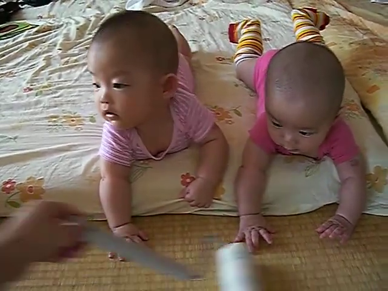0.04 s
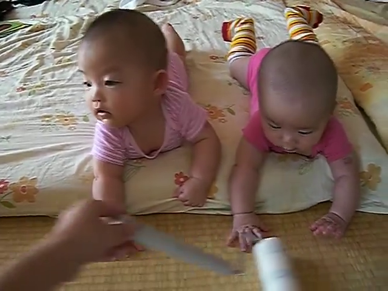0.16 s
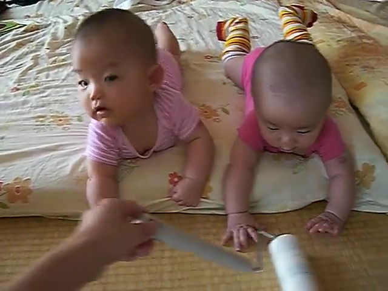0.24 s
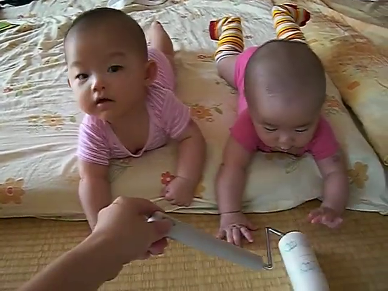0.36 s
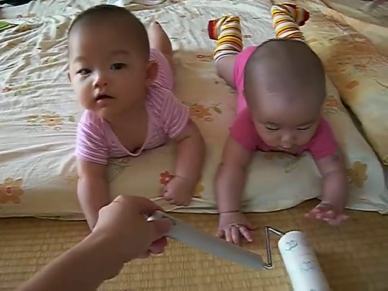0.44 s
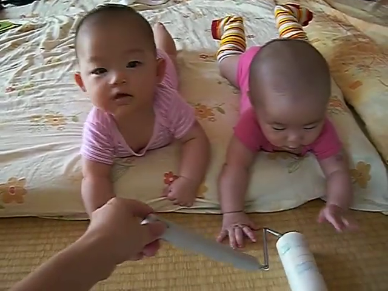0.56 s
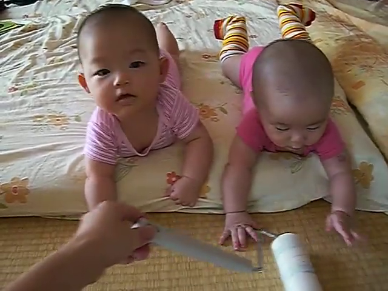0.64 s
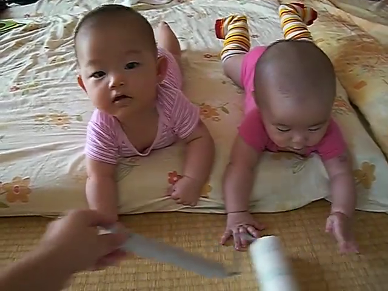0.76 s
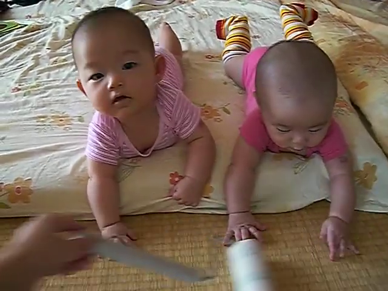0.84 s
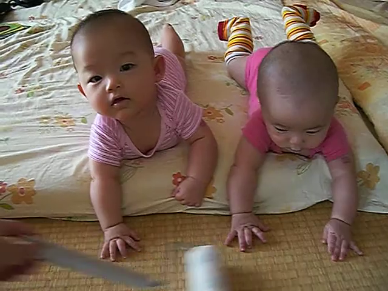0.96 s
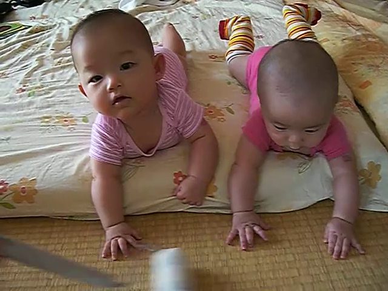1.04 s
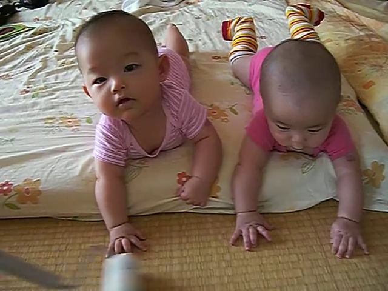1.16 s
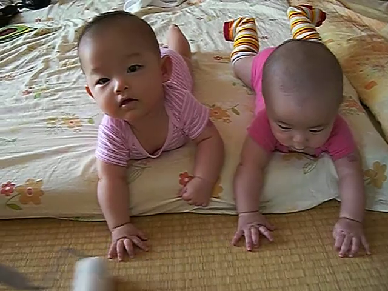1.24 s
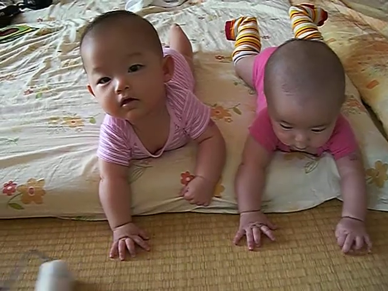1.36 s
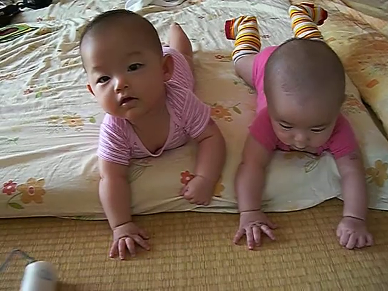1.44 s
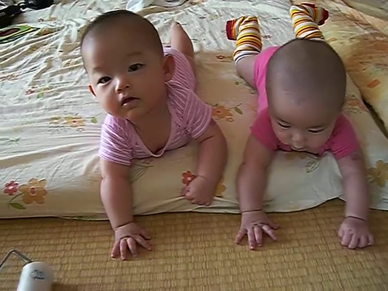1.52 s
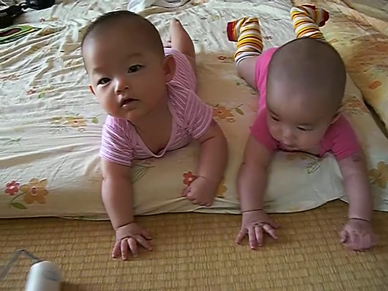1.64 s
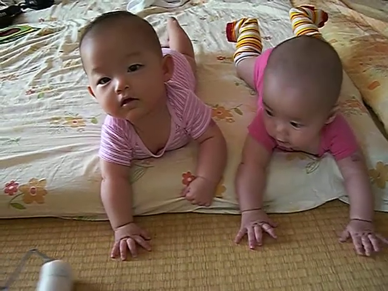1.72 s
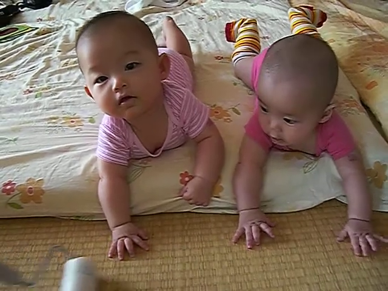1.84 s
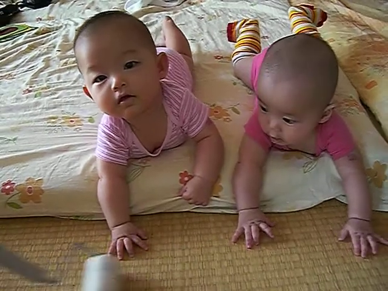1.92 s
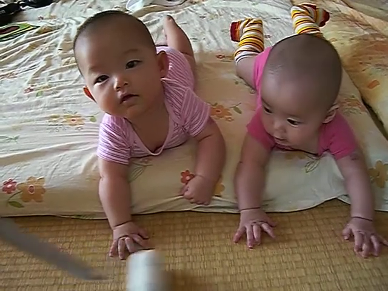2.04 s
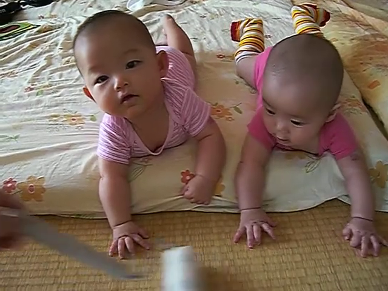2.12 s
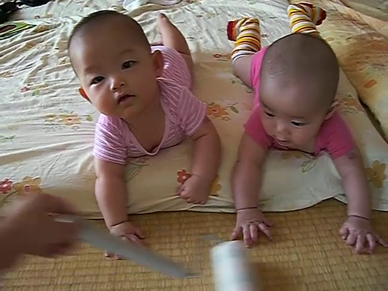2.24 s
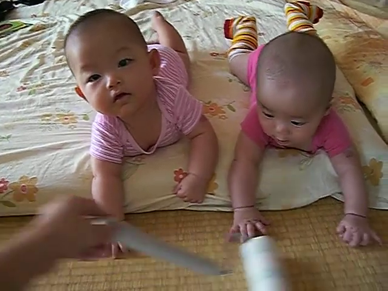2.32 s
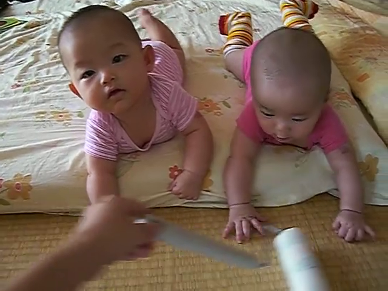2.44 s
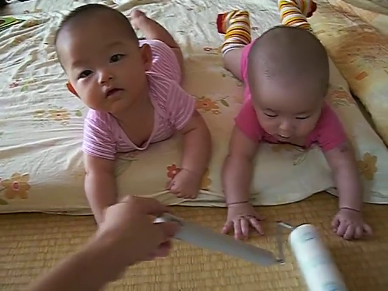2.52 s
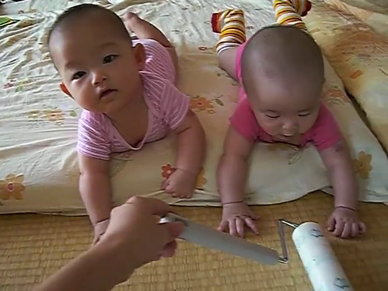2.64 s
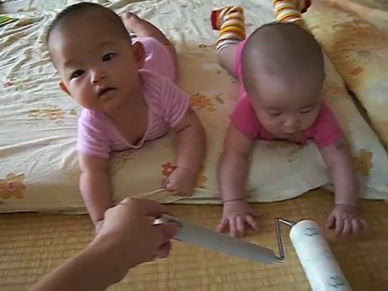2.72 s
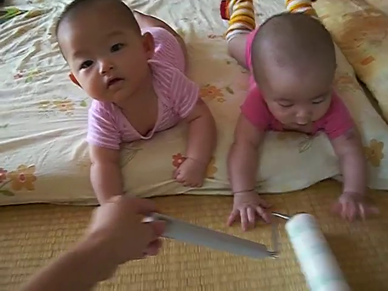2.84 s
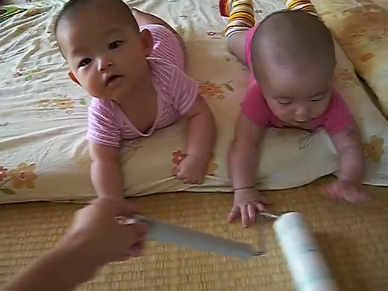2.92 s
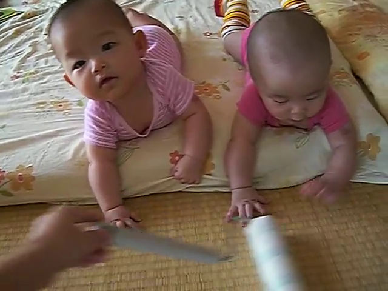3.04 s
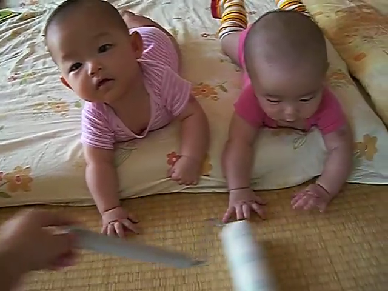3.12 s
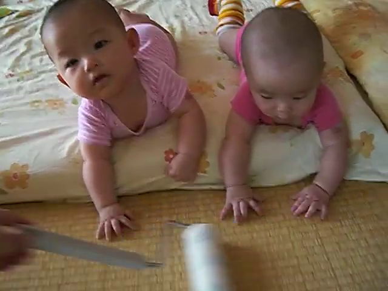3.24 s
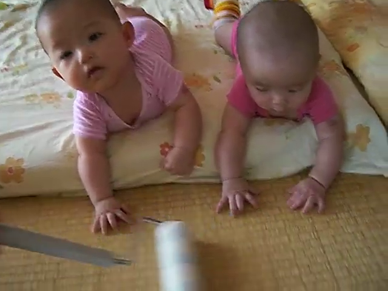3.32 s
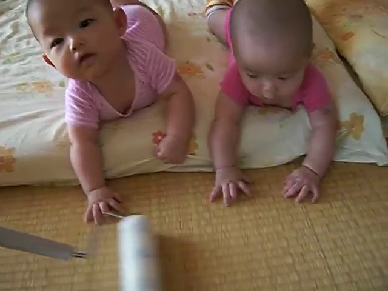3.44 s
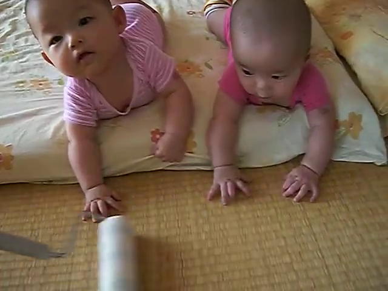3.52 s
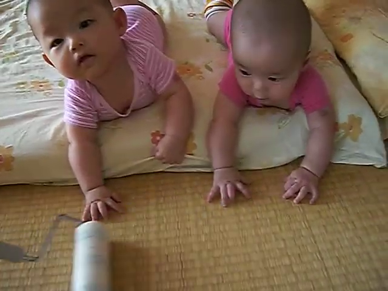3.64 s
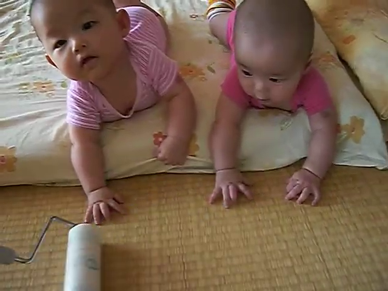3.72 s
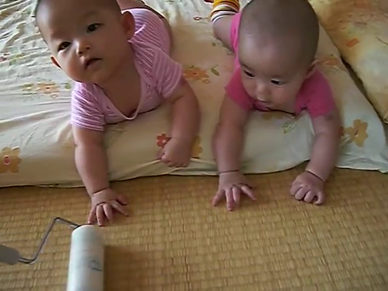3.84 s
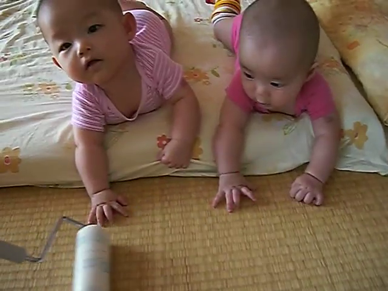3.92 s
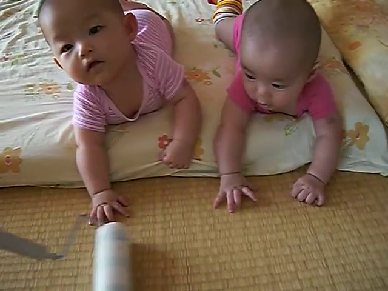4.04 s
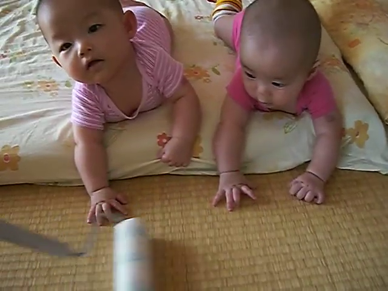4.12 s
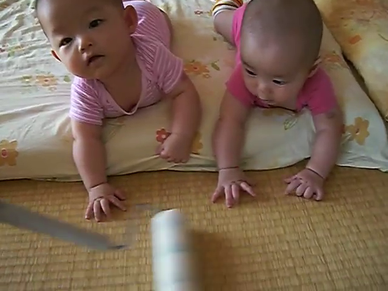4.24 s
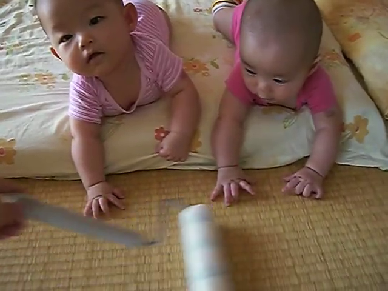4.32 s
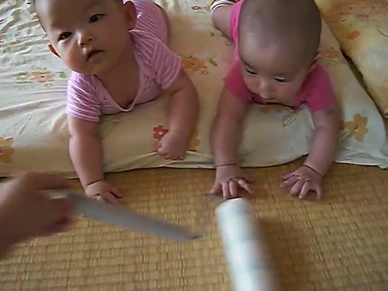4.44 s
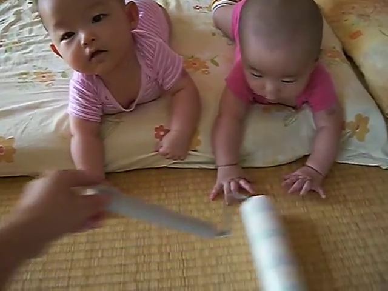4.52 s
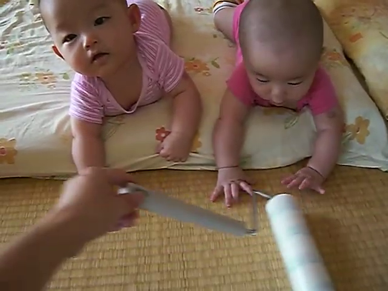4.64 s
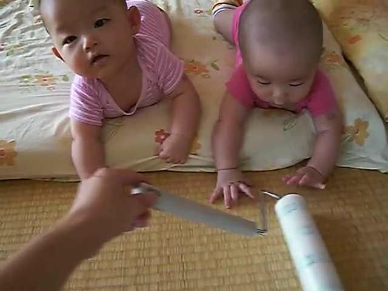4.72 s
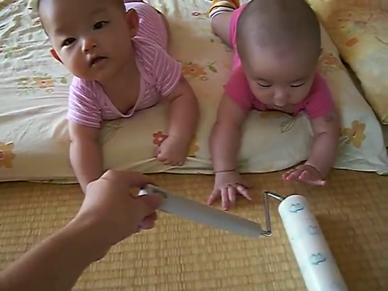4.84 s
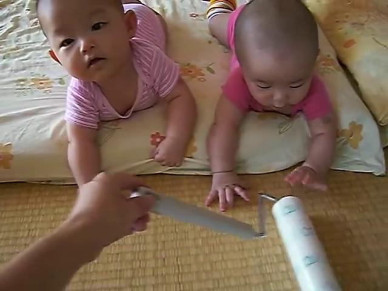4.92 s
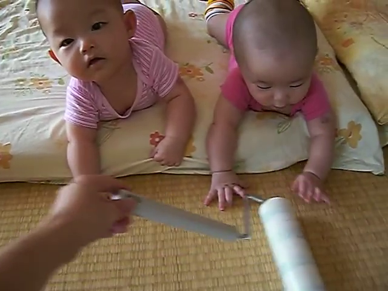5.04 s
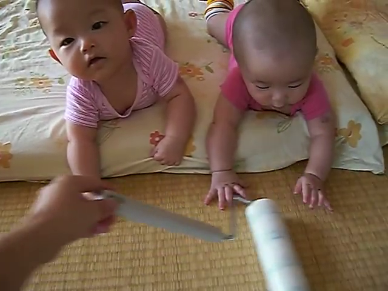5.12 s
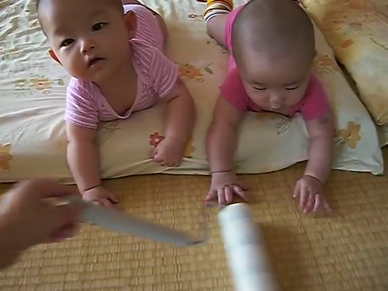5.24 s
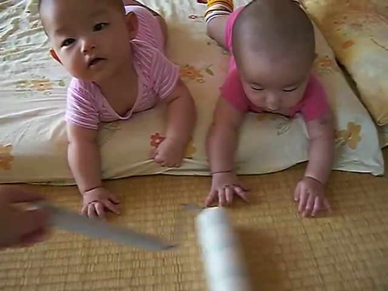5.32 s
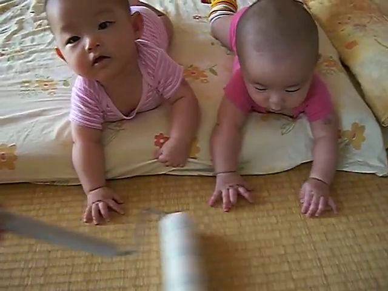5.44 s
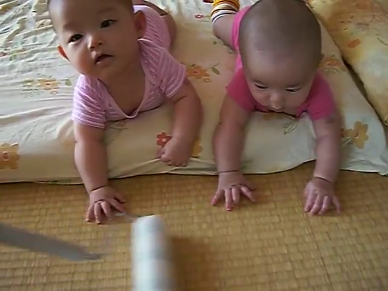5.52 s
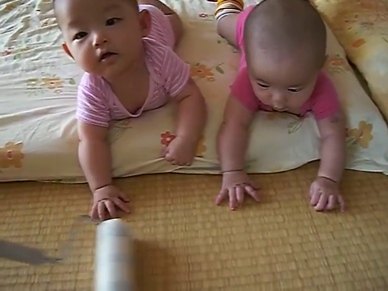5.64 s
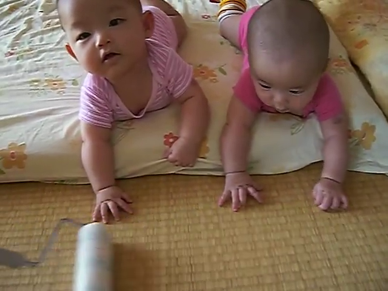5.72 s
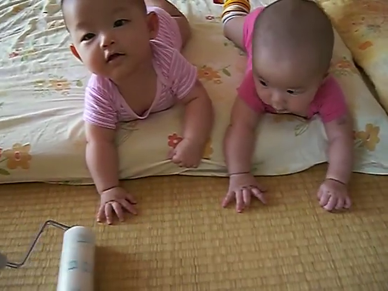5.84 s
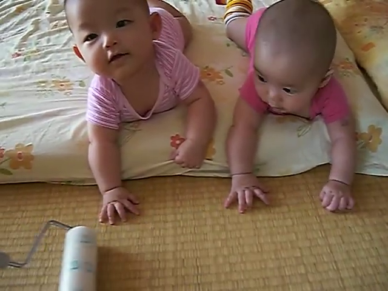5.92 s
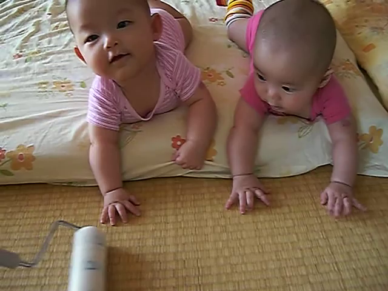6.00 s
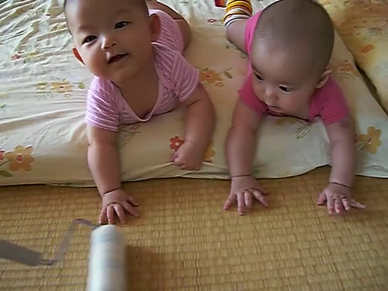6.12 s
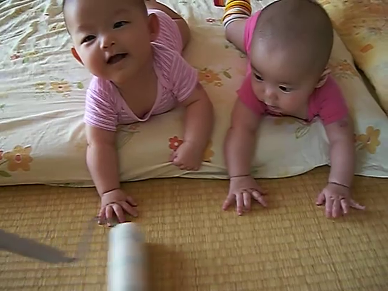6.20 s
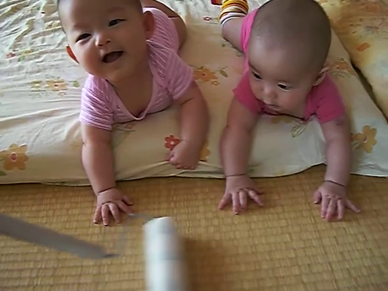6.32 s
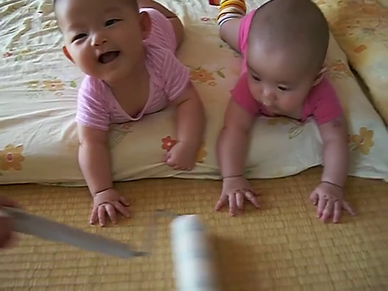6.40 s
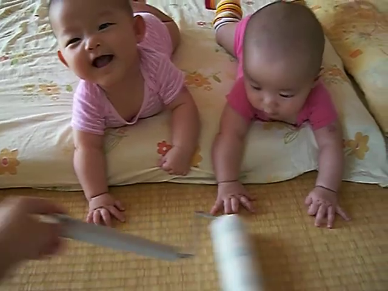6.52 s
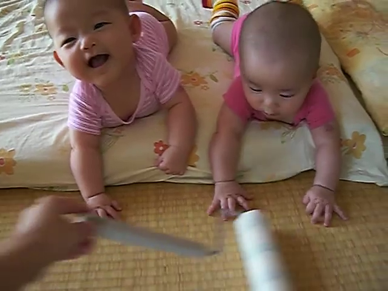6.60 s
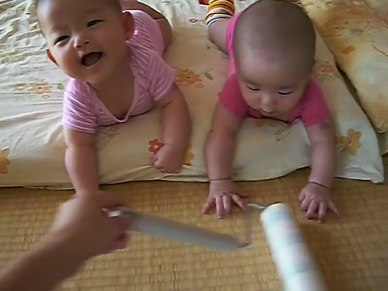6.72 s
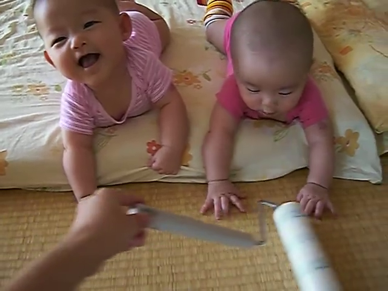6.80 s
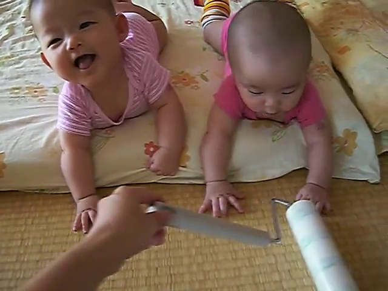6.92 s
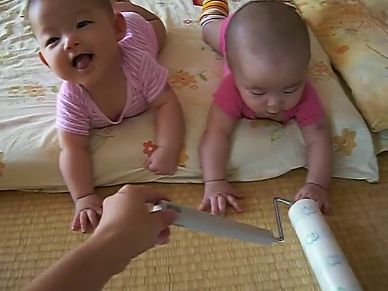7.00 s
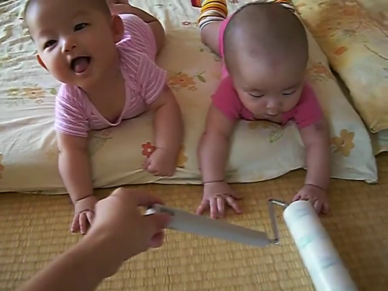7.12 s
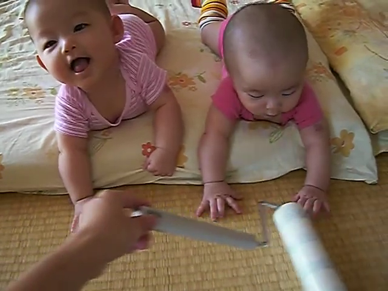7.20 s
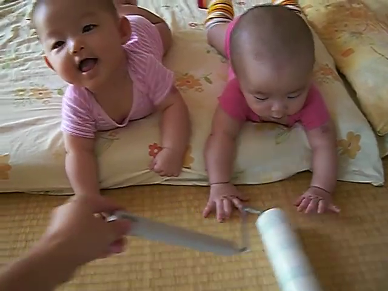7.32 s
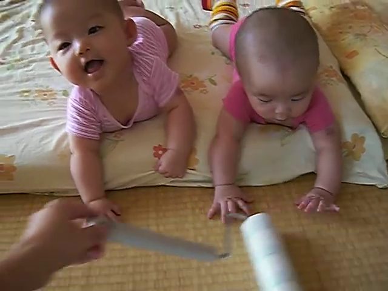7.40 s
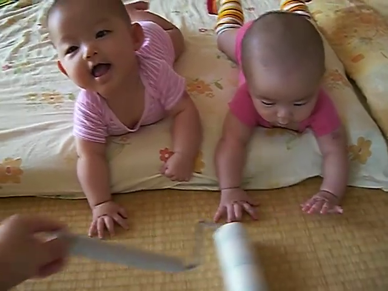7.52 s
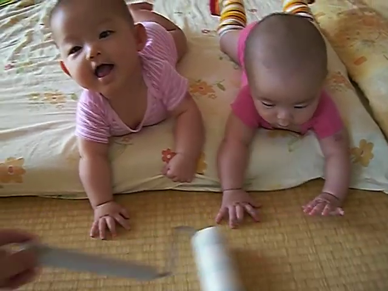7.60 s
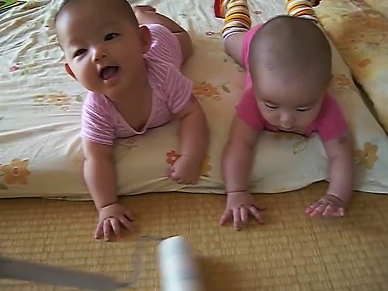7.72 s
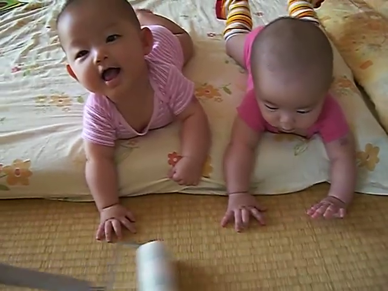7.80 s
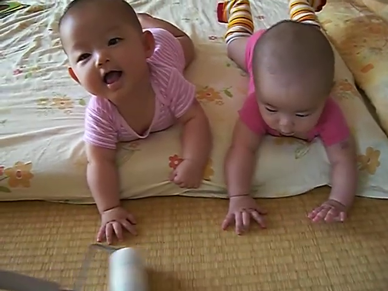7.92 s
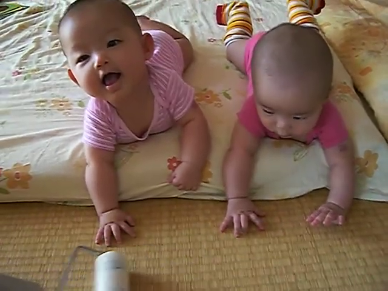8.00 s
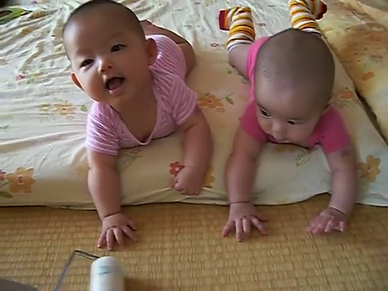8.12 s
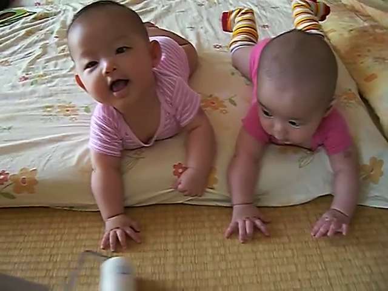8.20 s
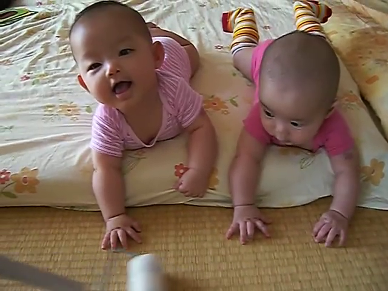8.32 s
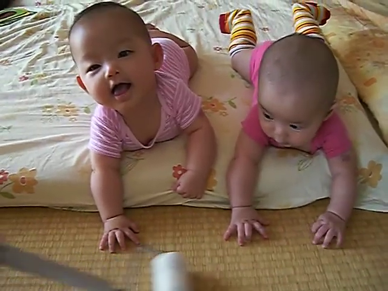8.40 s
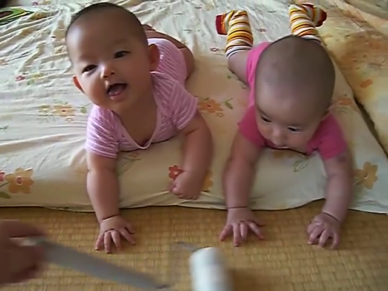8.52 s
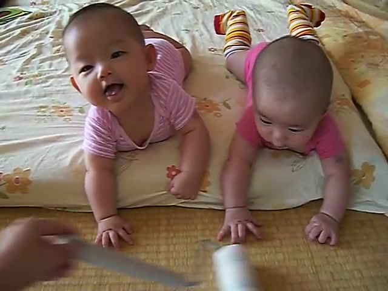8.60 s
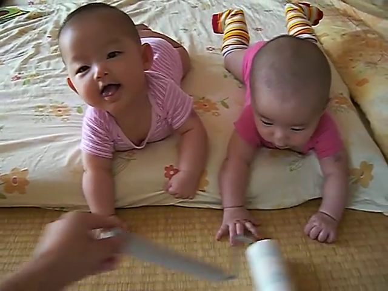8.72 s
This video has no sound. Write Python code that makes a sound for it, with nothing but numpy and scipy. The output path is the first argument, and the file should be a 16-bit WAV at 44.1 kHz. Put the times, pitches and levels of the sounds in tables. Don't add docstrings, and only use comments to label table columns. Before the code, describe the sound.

Dry, crisp, tearing crackle of an adhesive lint roller swishing to and fro across a rush mat, close up, with brief lulls at each turn.

```python
import sys
import numpy as np
from scipy import signal
from scipy.fft import rfft, irfft, next_fast_len
from scipy.io import wavfile
from scipy.ndimage import map_coordinates

SR = 44100
rng = np.random.default_rng(int(sys.argv[2]) if len(sys.argv) > 2 else 0)


def invert_db(x):
    u = np.asarray(x, float) / 20
    return 10 ** u


def file_out(sig):
    cols = np.atleast_2d(sig).T
    lim = np.clip(cols, -1, 1)
    pcm = np.round(lim * 32767).astype(np.int16)
    wavfile.write(sys.argv[1], SR, pcm)


N = 386309

TURNS = [-.56, .51, 1.6, 2.71, 3.86, 4.92, 5.97, 7.1, 8.16, 9.21]
# start t/s, stop t/s, crackle level/dB at top speed,
# share of the stroke before top speed [0-1], steepness of start and stop [exponent]
STROKES = [
    (-.52, 0.423, -23.5, 0.59, 0.95),
    (.55, 1.553, -23, .6, 0.91),
    (1.595, 2.622, -23.5, 0.62, 0.96),
    (2.78, 3.809, -26.5, 0.51, 0.85),
    (3.867, 4.864, -25.5, .55, 1.21),
    (4.965, 5.919, -24, 0.59, .8),
    (5.96, 7.013, -23.5, 0.54, 1.29),
    (7.18, 8.11, -25, 0.53, 0.78),
    (8.192, 9.155, -24.5, 0.42, 1.84),
]
TOP_RATE = [135, 140, 140, 95, 125, 115, 125, 115, 130]
# t/s, loss level/dB, half the passing time t/s
WORN_PATCHES = [(.11, 4, .02), (.28, 9.5, 0.0084), (.79, 8, 0.011), (.97, 2.5, 0.013), (1.2, 8.5, 0.011),
                (1.33, 4, 0.02), (2.08, 4.5, 0.02), (2.31, 1, 0.02), (3.04, 3.5, 0.016), (3.24, 6, 0.028),
                (3.64, 7, 0.011), (4.11, 14, 0.0072), (4.8, 2.5, .02), (5.05, 0.5, .03), (5.21, 8, 0.01),
                (5.411, 5.5, 0.019), (5.709, 11, 0.015), (6.25, 4.5, 0.043), (6.55, 6, 0.011),
                (6.94, 8, 0.028), (1.95, 4, .02), (.64, 6, .012), (7.28, 3, 0.022), (7.651, 7.5, 0.04),
                (7.92, -0.5, 0.022), (8.06, 17, 0.026), (8.61, 3.5, 0.021)]
# t/s, peak level/dB
CLEAR_TEARS = [(0.5585, -27.5), (0.5967, -20.5), (0.624, -20), (0.6503, -17.5), (0.716, -10.5),
               (1.6337, -30), (1.662, -31), (1.7204, -17), (2.7556, -27), (2.797, -19.5), (2.814, -26),
               (2.8383, -28), (2.8626, -12), (3.9005, -32), (3.951, -22), (4.9705, -25), (5.001, -13.5),
               (5.0095, -16), (5.067, -18), (6.0088, -26), (6.0506, -26), (6.0904, -15.5), (7.1576, -34),
               (7.1912, -22), (7.2178, -22), (7.2635, -17), (7.3376, -10.5), (8.2099, -26), (8.2372, -20),
               (8.2767, -27),
               (0.3597, -17), (0.391, -22), (0.416, -16.5), (1.4764, -21), (1.527, -18), (2.519, -13),
              (2.5447, -16), (2.5796, -17.5), (2.606, -13), (3.699, -10.5), (3.756, -16), (3.7743, -24),
              (3.8386, -21), (4.7355, -11), (4.7756, -16), (4.815, -17.5), (4.831, -27), (4.8513, -27),
              (5.8663, -12.5), (5.8832, -15.5), (5.9035, -17), (6.9042, -19), (6.9386, -21), (6.981, -24),
              (7.0275, -34), (7.0664, -37), (8.0096, -19), (8.07, -26), (8.1, -34), (8.1213, -27.5),
               (0.196, -9), (0.9013, -8.5), (1.2963, -8), (1.9624, -28), (2.15, -11), (3.015, -16),
              (3.1916, -6.5), (3.3596, -8), (3.5384, -6.5), (4.0637, -15), (4.1984, -10), (4.4847, -7.5),
              (4.6637, -11), (5.1277, -12), (5.1836, -8.5), (5.3564, -4.5), (5.672, -9), (6.2083, -9.5),
              (6.3225, -10), (6.379, -19), (6.5954, -5), (6.645, -6), (6.7725, -5.5), (6.8498, -9),
              (7.4405, -6), (7.889, -9), (7.933, -7.5), (8.4484, -23), (8.5318, -8), (8.6293, -18),
               (0.382, -18), (0.619, -26), (0.661, -16.5), (1.5028, -24), (1.649, -30), (1.6816, -23),
         (1.698, -21), (2.5866, -24), (2.7674, -30), (2.7843, -27), (2.8224, -22), (3.8192, -32),
         (3.9213, -31), (3.937, -28), (3.9736, -19), (4.9501, -42), (4.989, -23), (5.0205, -17),
         (5.033, -21), (6.0234, -22.5), (6.0337, -24), (6.0645, -24), (6.9627, -24), (7.0005, -32),
         (7.091, -42), (7.2294, -24), (7.2488, -21), (8.0364, -24), (8.0776, -26), (8.2609, -19)]
# f/Hz, level/dB per Hz
GLUE = [(40, -30), (175, -18), (620, -12.5), (900, -1), (1150, 1), (1700, -6), (2300, 0), (3900, 1),
        (6000, 0), (7600, -4), (10500, -7), (13500, -6.5), (15000, -7)]
# from f/Hz, to f/Hz
PARTS = [
    (1650, 4750),
    (4750, 7900),
    (7900, 30000),
    (10, 1650),
    (3300, 4500),
]
FACING = {"right": [(0, 0, -1.5, -1), (.3, -2, -5, -6.5), (.6, -1.5, -4, -7), (1, -4, 0, -2.5)],
          "left": [(0, -1, 0, -1), (.3, 0.5, -3, -7.5), (.65, -3, -4.5, -8), (1, -3, -6, -4)]}
ECHO_MS = [2, 1.15, 2.15, 1.13, 1.9, 1.16, 2, 1.05, 1.87, 1.1]
ECHO_SHARE = [.55, .65, .2, .3, .55]
# f/Hz, time to fall 60 dB t/s
ROOM = [(200, 0.21), (2000, 0.17), (10000, 0.11)]
# f/Hz, level/dB per Hz
BOARDS = [(30, -23), (70, -22), (170, 11), (600, 8), (900, -21), (1500, -29)]
# f/Hz, level/dB per Hz
AIR = [(20, 7.5), (60, 9.5), (120, 7.5), (500, 7.5), (1100, 5), (1500, -6), (2200, -47)]
# f/Hz, rms level/dB
TONES = [
    (119.8, -66),
    (15734, -71),
]
# f/Hz, width f/Hz
NOTCHES = [(4720, 560), (7880, 350), (9420, 360), (14130, 160)]
# f/Hz, level/dB per Hz
HISS = [(1000, -27), (1700, -1), (4700, -9.5), (6260, -6), (7750, -15), (14700, -7.5), (15500, -3)]

CREEP_RATE, FAST_RATE = 55, 135
RESTING_DB = -84
WORN_GAPS = 3.6
SNAP_DB, SNAP_SLOW_DB, SNAP_SCATTER_DB = 4, 23, 2.5
ECHO_RIGHT, ECHO_LEFT, ECHO_GROWS = .08, .4, .16
HISS_DB, TOP_HZ = -58, 15790


def unit(x):
    return x / np.sqrt(np.mean(x ** 2) + 1e-20)


def along(points, hz):
    f, v = np.transpose(points)
    return np.interp(np.log(hz + 1), np.log(f + 1), v)


def curves(rows, at):
    s, *cols = np.transpose(rows)
    return [np.interp(at, s, c) for c in cols]


def filtered(x, response):
    m = next_fast_len(N + SR // 4)
    return irfft(rfft(x, m) * response(np.fft.rfftfreq(m, 1 / SR)), m)[..., :N]


def coloured(points):
    return unit(filtered(rng.standard_normal(N), lambda hz: invert_db(along(points, hz))))


def stroke_at(t):
    stroke = np.interp(t, TURNS, np.arange(len(TURNS)))
    number = stroke.astype(int)
    return number, stroke % 1, number % 2 == 0


def strands():
    turn, done, _ = stroke_at(np.arange(N) / SR)
    per_s = CREEP_RATE + (np.take(TOP_RATE, turn) - CREEP_RATE) * np.sin(np.pi * done)
    uneven = map_coordinates(rng.standard_normal(800), [np.arange(N) * 60 / SR])
    return np.cumsum(per_s) / SR + .25 * uneven, per_s


def worn_db(t):
    return sum(db * np.exp(-((t - s) / half_s) ** 2) for s, db, half_s in WORN_PATCHES)


def peel_db(t):
    power = invert_db(2 * RESTING_DB)
    for start, stop, db, lean, steep in STROKES:
        done = np.clip((t - start) / (stop - start), 0, 1)
        done = done ** (np.log(.5) / np.log(lean))
        power = power + invert_db(2 * db) * np.abs(np.sin(np.pi * done)) ** (2 * steep)
    return 10 * np.log10(power) - worn_db(t)


def crackle(passed, per_s, count=60000):
    u = rng.random((count, 2))
    t = u[:, 0] * (N - 1) / SR
    at = (t * SR).astype(int)
    passed, per_s = passed[at], per_s[at]
    grip_db = 1.6 * rng.standard_normal(2000)[passed.astype(int) + 9]
    speed = per_s / FAST_RATE
    trail = 0.12 * speed ** 3 * invert_db(-2 * WORN_GAPS * worn_db(t))
    since_s = (passed % 1) / per_s
    rise_s, burst_s = 0.00046, 0.0028
    burst = np.exp(-since_s / burst_s) * (1 - np.exp(-since_s / rise_s))
    bunch = (trail + burst) / (trail + 1.3 * burst_s * per_s)
    size = np.sqrt(bunch) * invert_db(grip_db - 3.5 * np.log(u[:, 1] + .003))
    size /= np.sqrt(np.sum(size ** 2) / N)
    return t, size * invert_db(peel_db(t) - 1.13 - 1.9 * (1 - speed) ** 2)


def snaps(passed, per_s, count=16):
    clear = np.transpose(CLEAR_TEARS)
    gone = np.flatnonzero(np.diff(np.floor(np.maximum.accumulate(passed))))
    spread = np.clip(rng.standard_normal(len(gone)), -3, 1.6)
    slow_db = SNAP_SLOW_DB * (1 - per_s[gone] / FAST_RATE)
    own_db = peel_db(gone / SR) + SNAP_DB + slow_db + SNAP_SCATTER_DB * spread
    apart_s = np.abs(gone[:, None] / SR - clear[0]).min(axis=1)
    own_db -= 30 * (apart_s < .007)
    s, db = np.hstack([clear, [gone / SR, own_db]])
    lag = rng.random((len(s), count)) * np.arange(count) * .0003
    share = invert_db(-2200 * lag + 2 * rng.standard_normal(lag.shape))
    share /= np.linalg.norm(share, axis=1, keepdims=True)
    return (s[:, None] + lag).ravel(), (invert_db(db + 9.5)[:, None] * share).ravel()


def ring(lo_hz, hi_hz):
    hz = np.fft.rfftfreq(4096, 1 / SR) + 1
    gain = invert_db(along(GLUE, hz)) / np.sqrt((1 + (lo_hz / hz) ** 8) * (1 + (hz / hi_hz) ** 8))
    c = irfft(np.log(gain + 1e-6))
    c[1:2048] *= 2
    c[2049:] = 0
    h = irfft(np.exp(rfft(c)))[:1024]
    return h / np.linalg.norm(h)


def tear(t, size, scatter_db, tube_db):
    turn, done, rightward = stroke_at(t)
    place = turn + (1 - np.cos(np.pi * done)) / 2
    delay_ms = np.interp(place, np.arange(len(TURNS)), ECHO_MS)
    strength = np.where(rightward, ECHO_RIGHT, ECHO_LEFT + ECHO_GROWS * done)
    edge_db, fizz_db, body_db = np.where(rightward, curves(FACING["right"], done), curves(FACING["left"], done))
    end_db = np.where(rightward, -3, -14)
    levels_db = [-1.2, edge_db, fizz_db, body_db + tube_db, end_db]
    at = (t * SR).astype(int)
    echo_at = ((t + delay_ms / 1000) * SR).astype(int)
    out = np.zeros(N)
    for band, db, back in zip(PARTS, levels_db, ECHO_SHARE):
        scatter = 1 + invert_db(scatter_db) * rng.standard_normal(len(t))
        kick = size * invert_db(db) * scatter / np.sqrt(1 + invert_db(2 * scatter_db))
        train = np.bincount(at, kick, N + SR)
        train += np.bincount(echo_at, kick * strength * back, N + SR)
        out += signal.fftconvolve(train[:N], ring(*band))[:N]
    return out


def room(x):
    out, step = np.zeros(N + SR), SR // 6
    for start in range(0, N, step):
        hz, t, z = signal.stft(rng.standard_normal(SR // 4), SR, nperseg=256)
        decay = invert_db(-60 * t / along(ROOM, hz)[:, None])
        tail = signal.istft(z * decay, SR, nperseg=256)[1]
        wet = signal.fftconvolve(x[start:start + step], tail / np.linalg.norm(tail))
        out[start + 130:][:len(wet)] += wet
    return out[:N]


def boards():
    t = np.arange(0, N, 64) / SR
    level_db = np.interp(np.arange(N) / SR, t, peel_db(t))
    return invert_db(-44 + 0.74 * (level_db + 25.5)) * coloured(BOARDS)


def hush():
    t = np.arange(N) / SR
    tones = sum(np.sqrt(2) * invert_db(db) * np.sin(2 * np.pi * hz * t) for hz, db in TONES)
    return invert_db(-54) * coloured(AIR) + tones


def scene():
    weave = strands()
    roller = tear(*crackle(*weave), scatter_db=2, tube_db=0.27)
    roller += tear(*snaps(*weave), scatter_db=10.5, tube_db=-1.5)
    return (roller + invert_db(-11) * room(roller) + boards() + hush())[None]


def notches(f):
    response = 1
    for c, w in NOTCHES:
        response = response * (c * c - f * f + .13j * f * w) / (c * c - f * f + 1j * f * w)
    return response


def top_cut(x):
    return signal.sosfilt(signal.butter(12, 17090, fs=SR, output="sos"), x)


def record(dry):
    x = dry / (1 + np.abs(dry / .7) ** 3) ** (1 / 3)
    x = filtered(x, lambda f: notches(f) * invert_db(4 / (1 + (14300 / (f + 1)) ** 40)))
    hiss = filtered(rng.standard_normal(N), lambda hz: invert_db(along(HISS, hz)) * (hz < TOP_HZ))
    x = x + invert_db(HISS_DB) * unit(hiss)
    x = filtered(x, lambda f: .003 * (f < 16600) + 1 / np.sqrt(1 + (f / TOP_HZ) ** 1600))
    return top_cut(x)


dry = scene()
out = record(dry)
file_out(out)
```